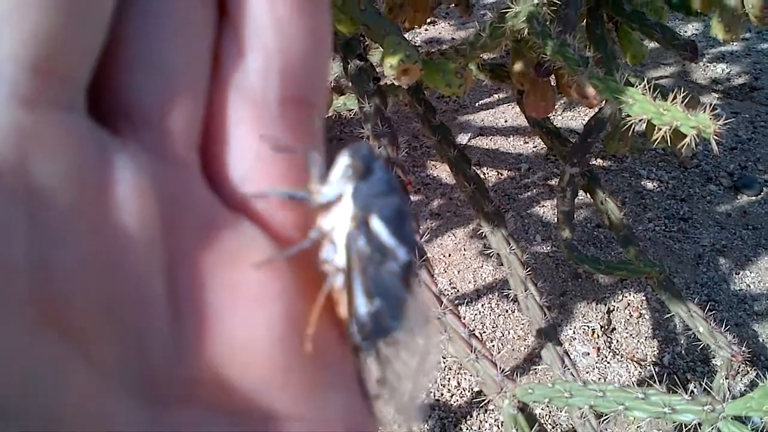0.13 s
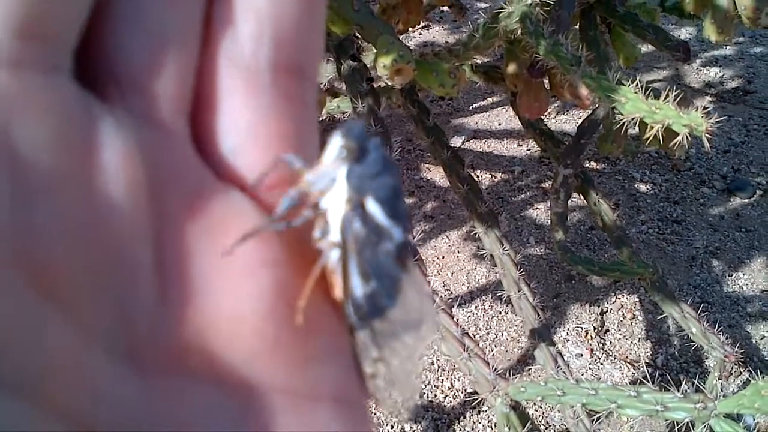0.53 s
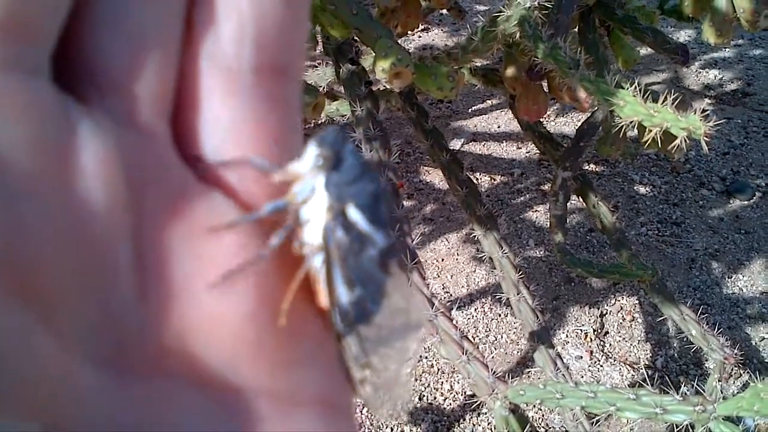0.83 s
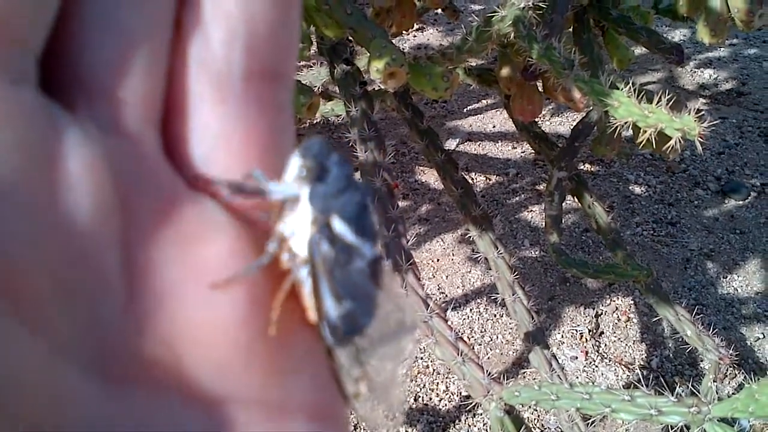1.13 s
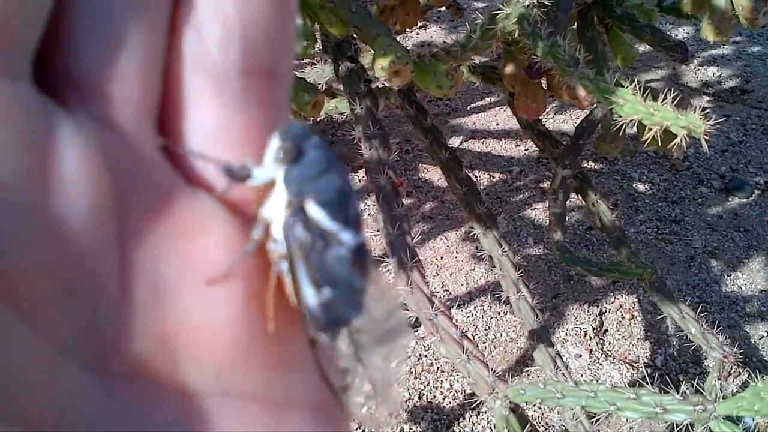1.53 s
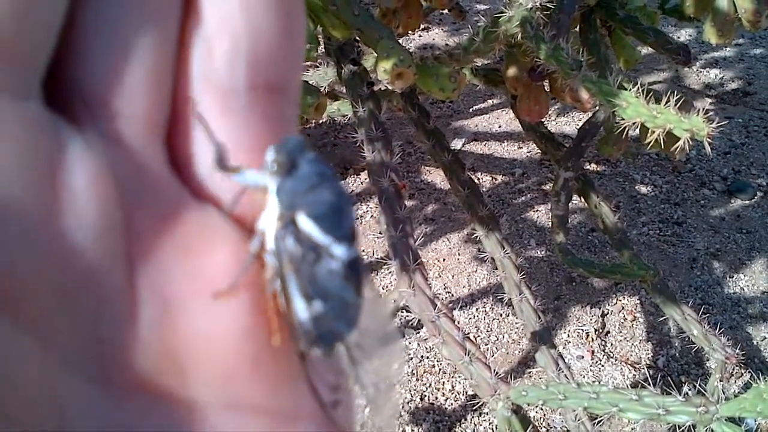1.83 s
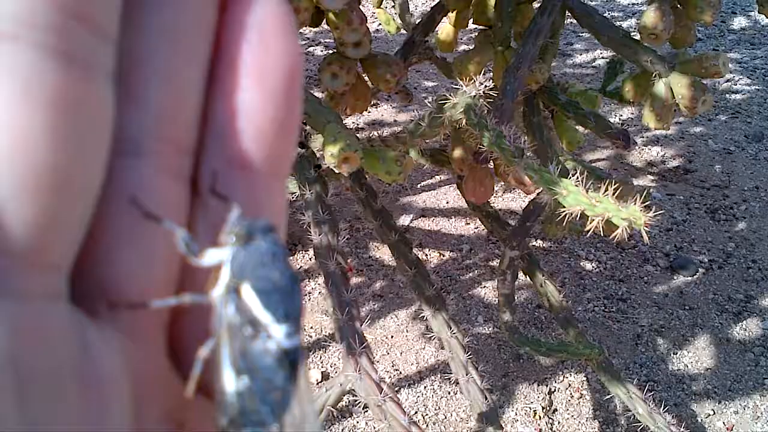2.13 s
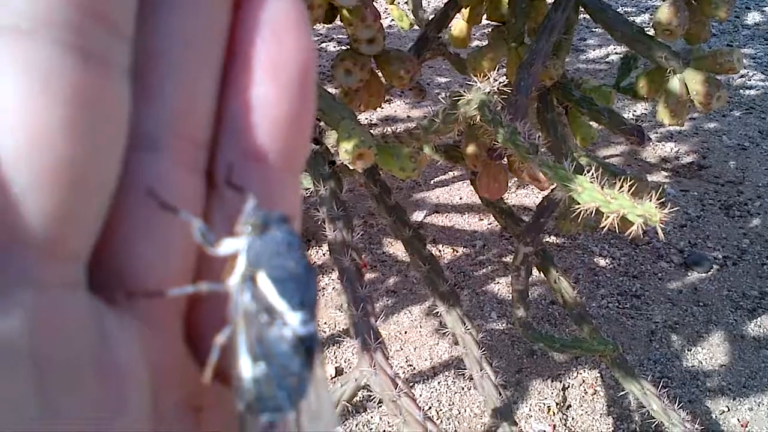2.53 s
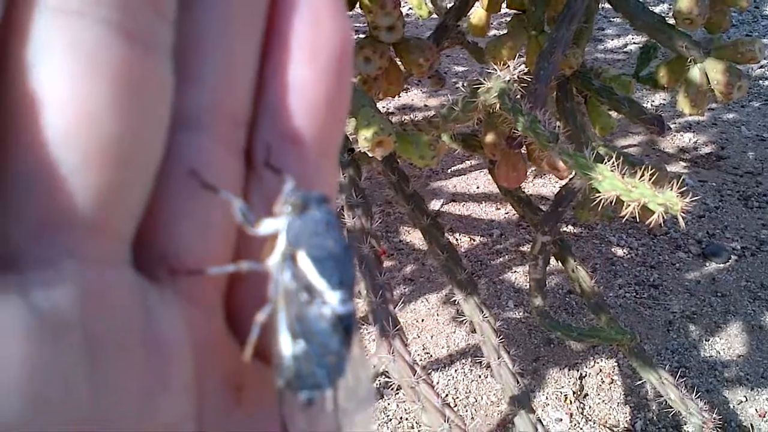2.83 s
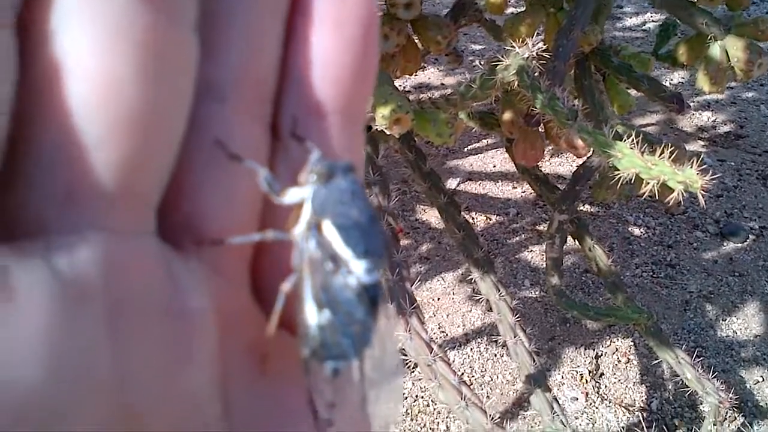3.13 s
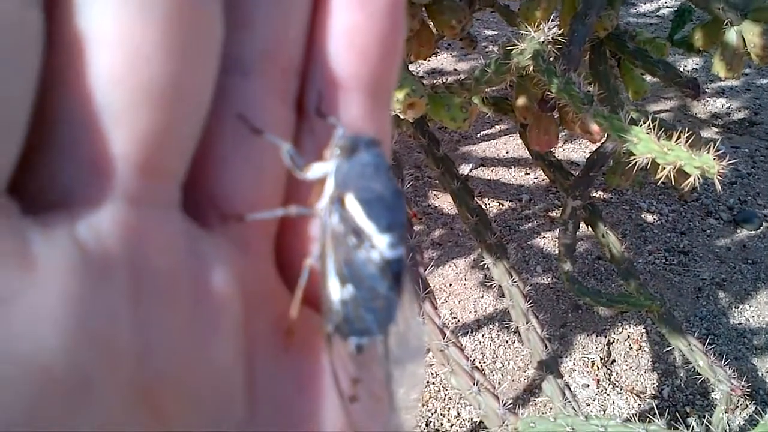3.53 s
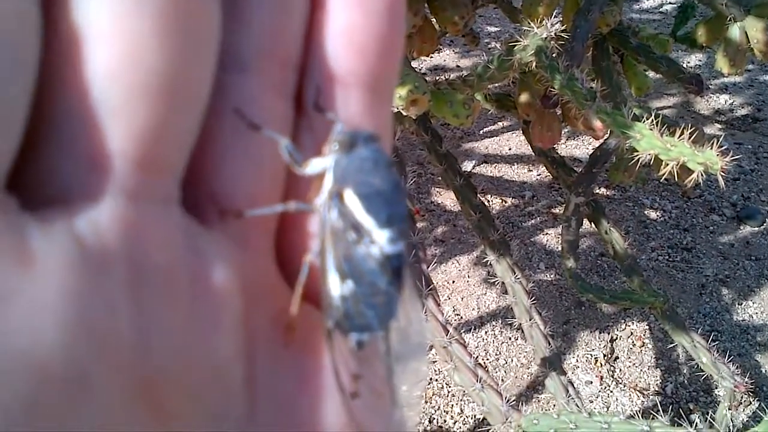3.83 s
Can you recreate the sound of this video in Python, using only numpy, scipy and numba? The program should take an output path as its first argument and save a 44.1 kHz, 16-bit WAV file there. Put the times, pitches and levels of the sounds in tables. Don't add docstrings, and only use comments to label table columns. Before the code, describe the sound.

Quiet open scrub with faint far birds, soft rumble and light finger bumps; two hard handling thuds, then a close cicada abruptly starts a dry, bright, fast-pulsing buzz that continues without stopping.

```python
import sys
import numpy as np
from scipy import signal
from scipy.io import wavfile
from scipy.ndimage import uniform_filter1d
from numba import njit

SR = 44100
rng = np.random.default_rng(int(sys.argv[2]) if len(sys.argv) > 2 else 0)


def nominal_scale(level):
    x = np.asarray(level, float) / 20
    return 10 ** x


def inscribe(sig):
    pcm = np.round(np.clip(np.atleast_2d(sig).T, -1, 1) * 32767)
    wavfile.write(sys.argv[1], SR, pcm.astype(np.int16))


N = 176400
BUZZ_START_S = 2.130


def unit(x):
    return x / np.sqrt(np.mean(x ** 2))


def curve(table, col, t):
    columns = np.array(table)
    return np.interp(t, columns[:, 0], columns[:, col])


def band(x, lo_hz, hi_hz):
    edges_hz = [lo_hz, min(hi_hz, .49 * SR)]
    return signal.sosfilt(signal.butter(2, edges_hz, "bandpass", fs=SR, output="sos"), x)


def noise_band(lo_hz, hi_hz):
    return unit(band(rng.standard_normal(N), lo_hz, hi_hz))


def walk(rate_hz):
    k = int(SR / rate_hz)
    held = np.repeat(rng.standard_normal(400)[:N // k + 1], k)
    return unit(uniform_filter1d(uniform_filter1d(held, k), k)[:N])


# (time [s], soft level [dB], throb level [dB], throb length [ms])
SINGING_EFFORT = [(2.13, -41.5, -29, 3.8), (2.35, -40, -26.5, 4.6), (2.5, -37, -26.5, 7.7),
                  (2.62, -34.5, -20.5, 4.6), (2.8, -35.5, -23, 7.4), (3.1, -35.5, -21.5, 7.5),
                  (3.25, -35.5, -22, 9.1), (3.5, -36, -22.5, 8.4), (3.72, -37, -24, 9.8),
                  (3.82, -36, -21.5, 8.4), (4, -37, -22, 9.8)]


def cicada():
    throb_edge_ms, damp_after_ms, damp_ms = .45, .4, .44
    echo_ms, echo_db = 1.3, -37
    t = np.arange(N) / SR
    cycles = muscle_cycles(t)
    which, off_ms = nearest_throb(t)
    half_ms = curve(SINGING_EFFORT, 3, t) / 2
    window = np.clip((half_ms - np.abs(off_ms)) / throb_edge_ms + .5, 0, 1)
    gate = window * nominal_scale(curve(SINGING_EFFORT, 2, t))
    damp = np.exp(-np.maximum(off_ms - half_ms - damp_after_ms, 0) / damp_ms)
    steady = np.clip((t - BUZZ_START_S) / .0062, 0, 1) * nominal_scale(curve(SINGING_EFFORT, 1, t))
    loud = band(band(loud_throbs(cycles, gate, which) * damp, 2780, 24000), 2620, 12800)
    song = nominal_scale(9) * loud + nominal_scale(10) * soft_buzz(cycles, steady) + rustle(gate, steady)
    echo = nominal_scale(echo_db) * np.roll(song, int(echo_ms * SR / 1000)) * (t > BUZZ_START_S)
    return song + echo


# (time [s], bucklings per second [Hz])
MUSCLE_PACE = [(2.13, 463.3), (2.32, 468.7), (2.594, 471.3), (2.688, 469.9), (3.062, 471.9), (3.114, 475.4),
               (3.134, 481.4), (3.16, 479.9), (3.176, 468.4), (3.19, 470.6), (3.522, 470.7), (3.554, 473.9),
               (3.63, 471.5), (3.665, 466.5), (3.76, 464.3), (3.886, 470.8), (3.935, 481.7), (3.962, 468.8)]


def muscle_cycles(t):
    cycles = np.cumsum(curve(MUSCLE_PACE, 1, t)) / SR
    return cycles - cycles[int(2.1 * SR)]


# (throb number, centre time [s])
THROB_CLOCK = [(0, 2.1541), (5, 2.3157), (14, 2.6104), (22, 2.8773), (30, 3.1417), (34, 3.2686),
               (44, 3.5924), (47, 3.6856), (48, 3.7154), (52, 3.8423), (55, 3.9394), (57, 4.0018)]


def nearest_throb(t):
    number, centre_s = np.array(THROB_CLOCK).T
    which = np.round(np.interp(t, centre_s, number)).astype(int)
    return which, (t - np.interp(which, number, centre_s)) * 1000 + .2


# (place in cycle [0-1], ring [Hz], t60 [ms],
# level [dB], pitch sag [per ms])
THROB_RIBS = [(.059, 12220, 3.7, -21.7, 0), (.072, 8610, 5, -5, 0), (.308, 7570, 2.4, .6, 0),
              (.402, 10720, 5.5, -10, 0), (.426, 12260, 2.8, -9.7, 0), (.511, 6700, 7.3, -4.5, 0),
              (.797, 5480, 4.7, -.9, 0), (.808, 4040, 6.3, -2.1, 0), (.984, 2950, 2.9, -15.5, 0)]


def loud_throbs(cycles, gate, which):
    scatter_db, shift_us, jitter_us = 1.7, 9, 2.5
    per_throb = rng.standard_normal((len(THROB_RIBS), 2, 64))[:, :, which]
    drift = [(scatter_db * size, shift_us * 1e-6 * late) for size, late in per_throb]
    return buckle(THROB_RIBS, cycles, jitter_us, drift, gate)


# (place in cycle [0-1], ring [Hz], t60 [ms], level [dB], pitch sag [per ms])
BUZZ_RIBS = [(.02, 11080, 3.7, -2, 0), (.452, 10490, 5, -4, 0), (.738, 3600, 6.9, -9.1, 0),
             (.491, 4840, 5, -8.8, 0), (.266, 6760, 3, -6.8, 0), (.049, 8950, 1.6, -3, 0),
             (.379, 12900, 5.4, -14, 0), (.406, 14140, 1.2, -3, 0)]
# (place in cycle [0-1], ring [Hz], t60 [ms], level [dB], pitch sag [per ms])
AIR_SAC = [(.765, 2350, 11.9, -18.1, 0)]
# (time [s], level [dB])
ABDOMEN_LIFT = [(2.13, -1), (2.3, -3), (2.5, 2.5), (2.62, 3), (2.69, 0), (2.77, -5.5), (2.92, -2.5),
                (3.03, 3), (3.1, -3), (3.16, 5), (3.22, -15), (3.28, -4.5), (3.43, 3.5), (3.52, -3.5),
                (3.58, 3), (3.82, -3), (3.87, 3), (4, -2.5)]


def soft_buzz(cycles, steady):
    drift_db, drift_us, jitter_us = 2.5, 7, 4
    freedom = [.3] * 2 + [1] * len(BUZZ_RIBS[2:])
    drift = [(curve(ABDOMEN_LIFT, 1, np.arange(N) / SR), np.zeros(N))]
    for free in freedom:
        drift.append((free * drift_db * walk(40), free * drift_us * 1e-6 * walk(14)))
    return buckle([*AIR_SAC, *BUZZ_RIBS], cycles, jitter_us, drift, steady)


def rustle(gate, steady):
    rustle_level = gate * nominal_scale(-18) + steady * nominal_scale(-11 + 3.7 * np.minimum(walk(45), 0))
    fizz_level = steady * nominal_scale(-15.5 + 3 * walk(90))
    return noise_band(2960, 5500) * rustle_level + noise_band(10000, 17000) * fizz_level


def buckle(ribs, cycles, jitter_us, drift, gain):
    scatter_db, rise_cycles = 1.1, .96
    out, t = 0, np.arange(N) / SR
    for (place, ring_hz, t60_ms, db, sag), (size_db, late_s) in zip(ribs, drift):
        chance = rng.standard_normal((1000, 2))
        snap_s = np.interp(np.arange(1000) + place, cycles, t)
        i = (snap_s * SR).astype(int)
        size = gain[i] * nominal_scale(db + size_db[i] + scatter_db * chance[:, 1]) * (i < N - 1)
        start_s = snap_s + late_s[i] + jitter_us * 1e-6 * chance[:, 0]
        sag_rate = 1 + 1000. * max(sag, 0)
        out = out + rings(N, start_s, size, 1. * ring_hz, t60_ms / 1000, rise_cycles, sag_rate)
    return out


@njit
def rings(size, starts_s, gains, hz, t60_s, rise, sag):
    out = np.zeros(size)
    for k in range(len(starts_s)):
        first = int(starts_s[k] * SR) + 1
        if gains[k] > 0:
            for i in range(first, min(first + int(t60_s * SR), size)):
                age = i / SR - starts_s[k]
                turns = hz * (1 - np.exp(-sag * age)) / sag
                decay = np.exp(-np.log(1000) * age / t60_s)
                out[i] += gains[k] * np.sin(2 * np.pi * turns) * decay * min(age * hz / rise, 1.)
    return out


# (time [s], peak [dB], ring [Hz], t60 [ms], crack [dB])
HOUSING_PUSHES = [(.083, -41.5, 1096, 21, -20), (.175, -39.5, 580, 11, 6), (.176, -37.5, 1170, 5.8, -10),
                  (.856, -33.5, 276, 22, -4), (.858, -41.5, 1004, 40, -12), (1.712, -52, 1050, 11, -12),
                  (1.945, -27, 450, 2.7, -13), (1.9661, -12, 588, 7.8, 9), (1.9676, -3.5, 950, 0.78, -29),
                  (1.970, -14, 420, 5.2, -26), (1.9675, -32, 85, 56, -30), (2.014, -31, 860, 6.4, -16),
                  (2.098, -43, 2140, 3.2, 7.5), (2.123, -21, 66.4, 28, -25), (1.9448, -47, 6500, 3, -10),
                  (1.966, -21.5, 1140, 14, -20), (2.1238, -30.5, 6530, 3, -13),
                  (2.1245, -38, 11200, 3.3, 5), (1.9495, -43, 2000, 3.7, 2), (1.9668, -18, 3060, 2, -1)]
# (time [s], peak [dB], ring [Hz], t60 [ms], crack [dB])
HOUSING_PULLS = [
    (1.950, -31, 516, 38, -12),
    (2.1216, -7, 520, 5.8, -3.5),
    (2.1264, -6, 488, 4, -8),
    (2.131, -20.5, 367, 10, -25),
]


def knocks():
    rise_ms, crack_ms, limit = 1.2, .81, .29
    out, age = np.zeros(N), np.arange(4000) / SR
    age_ms = age * 1000
    for table, sign in ((HOUSING_PUSHES, 1), (HOUSING_PULLS, -1)):
        for s, db, hz, t60_ms, crack_db in table:
            rise = (1 - np.exp(-age_ms / rise_ms)) ** 2
            body = sign * np.sin(2 * np.pi * hz * age) * nominal_scale(-60 * age_ms / t60_ms) * rise
            grit = band(rng.standard_normal(4000), 1080, 4330)
            crack = grit * age_ms / crack_ms * np.exp(-age_ms / crack_ms)
            i = int(s * SR)
            out[i:i + 4000] += nominal_scale(db) * (body / np.abs(body).max() + nominal_scale(crack_db) * crack)
    return limit * np.tanh((np.abs(out) / limit) ** 3) ** (1 / 3) * np.sign(out)


# (start [s], length [s], first pitch [Hz], last pitch [Hz], level [dB])
BIRD_WHISTLES = [
    (0, 0.1, 3910, 2810, -57.5),
    (.178, 0.021, 2650, 3030, -58),
    (.218, 0.034, 2870, 2220, -62.5),
    (.392, 0.017, 3360, 2500, -58.5),
]
# (start [s], length [s], first pitch [Hz], last pitch [Hz], level [dB])
BIRD_TRILLS = [(.56, 0.14, 3910, 3700, -61), (.57, .04, 3330, 3200, -68), (.68, 0.089, 3310, 3240, -68),
               (.74, 0.03, 3000, 2900, -63), (.51, 0.031, 2800, 2590, -66), (.84, 0.043, 4800, 4930, -67),
               (.87, 0.05, 4420, 4440, -64), (.97, 0.131, 2700, 2890, -64), (1.27, 0.12, 2820, 2620, -66.5),
               (1.48, .05, 5300, 5330, -71), (1.78, 0.074, 5240, 5240, -70)]


def birds():
    trill_hz, sweep_hz, depth = 84.8, 153, .38
    out = np.zeros(N)
    for notes, trill in ((BIRD_WHISTLES, 0), (BIRD_TRILLS, 1)):
        for s, length, first_hz, last_hz, db in notes:
            u = np.arange(int(length * SR)) / SR
            beat = 2 * np.pi * trill_hz * u
            uneven = np.clip(1 + .69 * walk(59.5)[:len(u)], 0, 2)
            glide_hz = first_hz + (last_hz - first_hz) * u / length
            hz = glide_hz + trill * sweep_hz * np.sin(beat) * uneven
            fade = np.clip(np.minimum(u, length - u) / .002, 0, 1)
            shape = fade * (1 + trill * depth * np.cos(beat))
            i = int(max(s, 0) * SR)
            out[i:i + len(u)] += np.sqrt(2) * nominal_scale(db) * shape * np.sin(2 * np.pi * np.cumsum(hz) / SR)
    blur = rng.standard_normal(3000) * nominal_scale(-60 * np.arange(3000) / SR / .13)
    blur = blur / np.sqrt(np.sum(blur ** 2))
    return nominal_scale(-1.5) * out + nominal_scale(-3) * signal.fftconvolve(out, blur)[:N]


# (frequency [Hz], level [dB rms])
MAINS_HUM = [(119, -54.5), (238, -62.5), (472, -72)]


def hum():
    t, flutter, out = np.arange(N) / SR, walk(6.76), 0
    for hz, db in MAINS_HUM:
        tone = np.sin(2 * np.pi * hz * t + 1.15 * walk(5.12))
        out = out + np.sqrt(2) * nominal_scale(db + 1.5 * flutter) * tone
    return out


# (time [s], level [dB])
WIND_GUSTS = [(0, 7), (.3, 4), (.45, 7), (.6, 8.5), (.7, -8), (1.2, -2), (2.0, 5.5), (4, -39)]


def wind():
    gust_db = curve(WIND_GUSTS, 1, np.arange(N) / SR) + 4.5 * walk(11.14)
    return noise_band(23.5, 90.5) * nominal_scale(-59.5 + gust_db)


# (frequency [Hz], level [dB rms])
SCRUB_AIR = [(25, -74), (60, -65), (150, -64.5), (260, -62.5), (420, -68.5), (750, -66), (1600, -72.5),
             (15000, -71.5)]
# (start [s], end [s])
HISS_MUTES = [(1.954, 1.963), (1.9705, 1.9745), (2.104, 2.108), (2.111, 2.119)]


def air():
    mute_db, mute_above_hz = -15, 1300
    t, out, swell = np.arange(N) / SR, 0, walk(3.3)
    muted = uniform_filter1d(sum(1. * (t > a) * (t < b) for a, b in HISS_MUTES), size=60)
    table_hz, table_db = np.array(SCRUB_AIR).T
    for hz in 22 * 2 ** (np.arange(29) / 3):
        low = np.clip(1 - np.log(hz / 60) / 5, .1, 1)
        db = np.interp(np.log(hz), np.log(table_hz), table_db)
        db = db + low * (.13 * swell + 4.26 * walk(8.64))
        db = db + mute_db * muted * (hz > mute_above_hz)
        out = out + nominal_scale(db) * noise_band(hz * .89, hz * 1.12)
    return out


def scene():
    return (cicada() + knocks() + birds() + hum() + wind() + air())[None]


# (centre time [s], low [Hz], high [Hz])
THIN_MOMENTS = [(2.235, 6300, 8800), (2.265, 12000, 12900), (2.365, 4200, 4900), (2.463, 5600, 6300),
                (2.529, 7700, 9100), (2.557, 7700, 9100), (2.76, 6000, 7400), (2.827, 5600, 6600),
                (2.83, 12000, 12900), (2.89, 5600, 7000), (2.96, 5600, 7000), (2.997, 7700, 9100),
                (3.055, 7000, 9100), (3.06, 3400, 4200), (3.06, 12000, 12900), (3.189, 4600, 8000),
                (3.253, 4200, 7900), (3.258, 12000, 12900), (3.318, 5600, 7000), (3.32, 12000, 12900),
                (3.385, 7700, 9100), (3.42, 7500, 8800), (3.451, 7000, 9100), (3.515, 5600, 6300),
                (3.507, 7700, 9100), (3.572, 5600, 7000), (3.572, 8400, 9100), (3.635, 4200, 4900),
                (3.643, 5600, 9100), (3.7, 5600, 7700), (3.763, 5600, 7000), (3.959, 5600, 9100)]


def thin_out(x):
    share, half = .85, int(17 * SR / 1000)
    out = x.copy()
    fade = np.clip(half / 100 - np.abs(np.arange(-half, half)) / 50, 0, 1)
    for s, lo_hz, hi_hz in THIN_MOMENTS:
        part = slice(int(s * SR) - half, int(s * SR) + half)
        sos = signal.butter(3, [lo_hz, hi_hz], "bandpass", fs=SR, output="sos")
        out[:, part] -= share * signal.sosfiltfilt(sos, x[:, part]) * fade
    return out


def band_limit(x):
    return signal.sosfilt(signal.butter(12, 15720, fs=SR, output="sos"), x)


def record(dry):
    limit, top_hz = .42, 15400
    rounded = limit * np.tanh(thin_out(dry) / limit)
    top_cut = signal.ellip(12, .2, 70, top_hz, fs=SR, output="sos")
    mix = signal.sosfilt(top_cut, rounded)
    return band_limit(mix)


dry = scene()
out = record(dry)
inscribe(out)
```